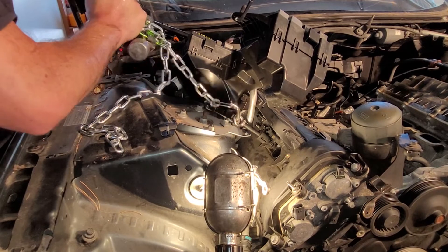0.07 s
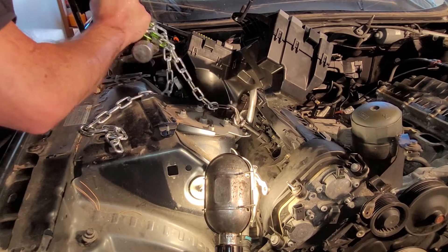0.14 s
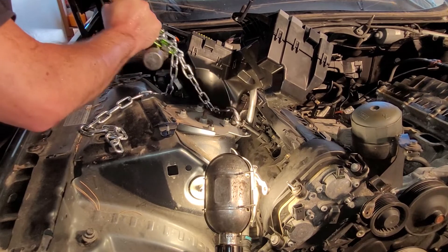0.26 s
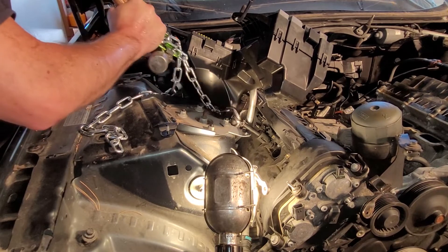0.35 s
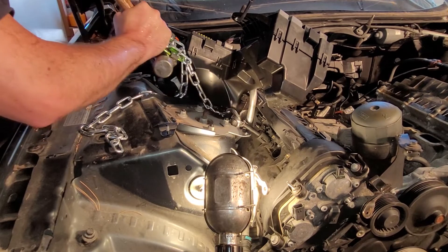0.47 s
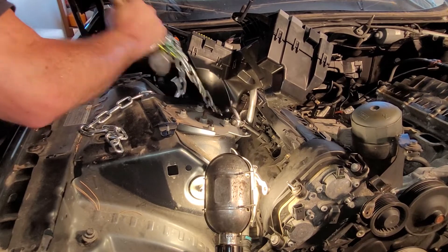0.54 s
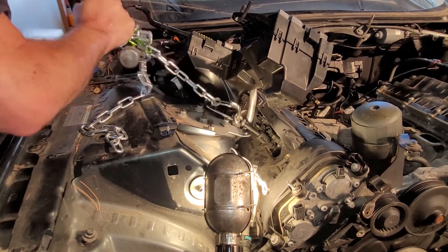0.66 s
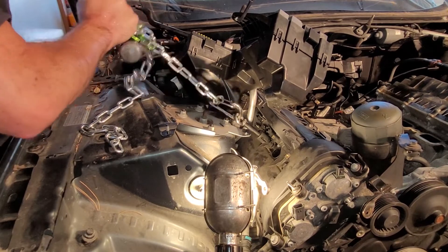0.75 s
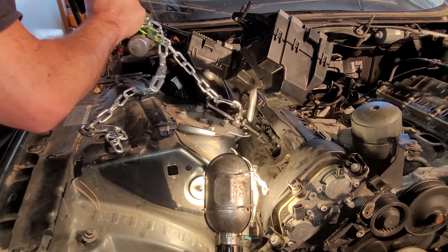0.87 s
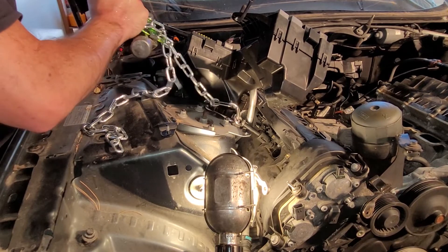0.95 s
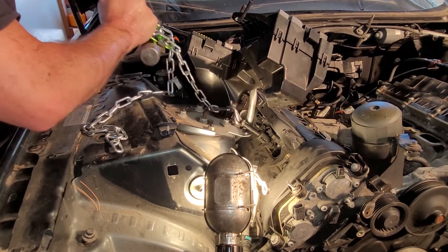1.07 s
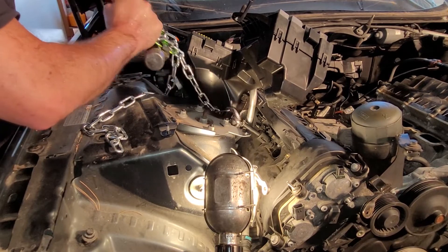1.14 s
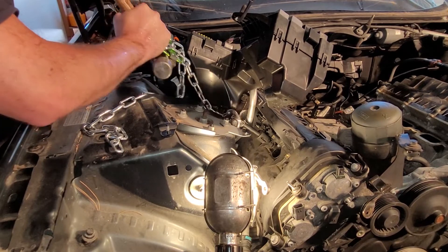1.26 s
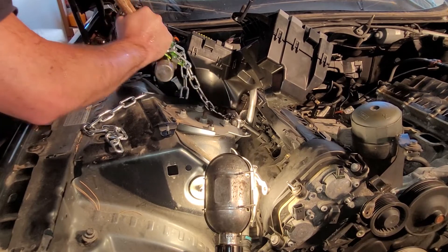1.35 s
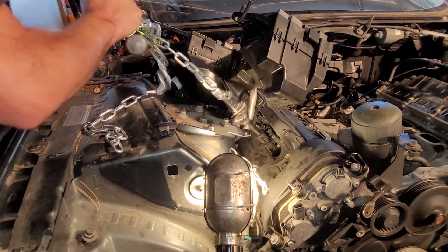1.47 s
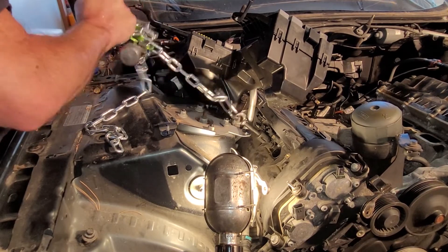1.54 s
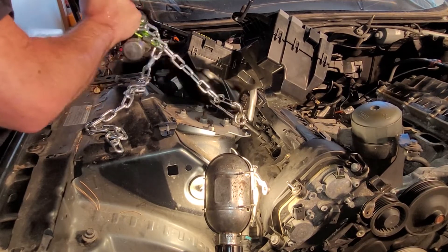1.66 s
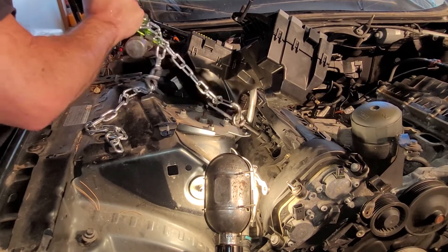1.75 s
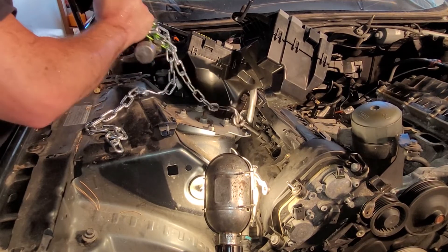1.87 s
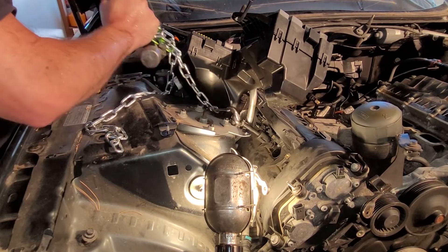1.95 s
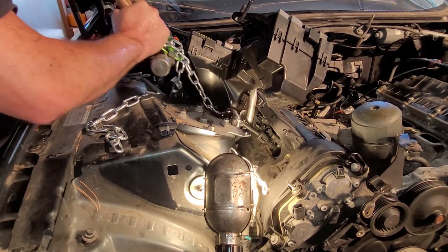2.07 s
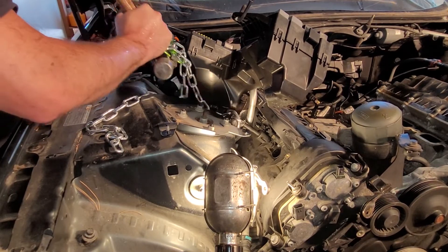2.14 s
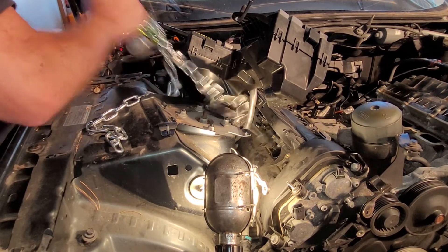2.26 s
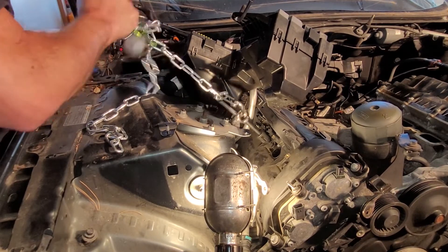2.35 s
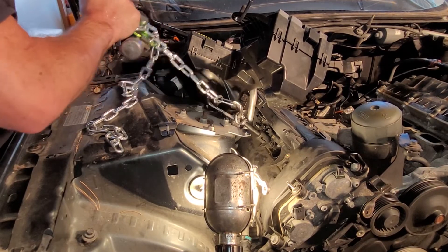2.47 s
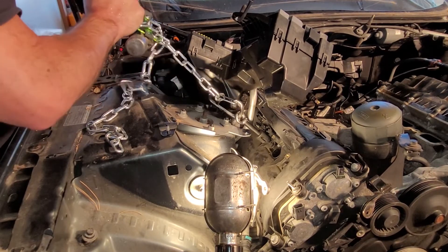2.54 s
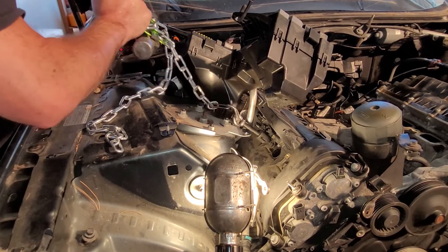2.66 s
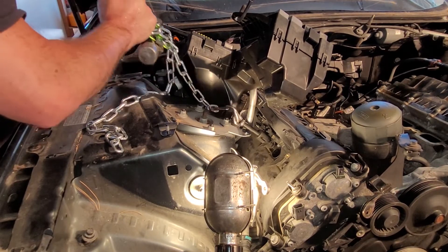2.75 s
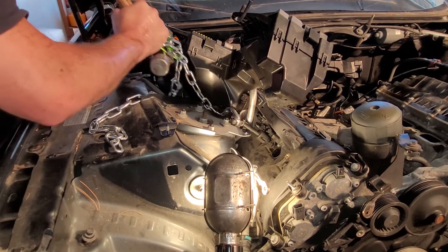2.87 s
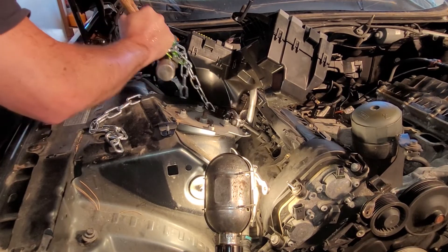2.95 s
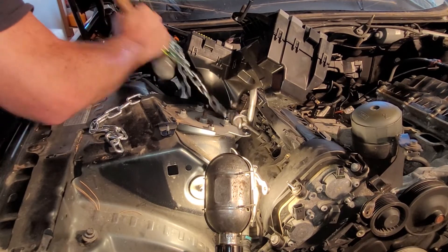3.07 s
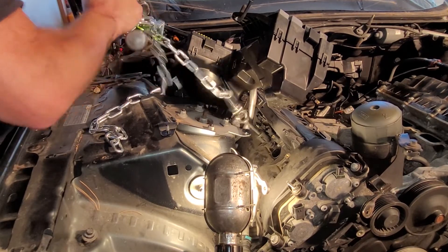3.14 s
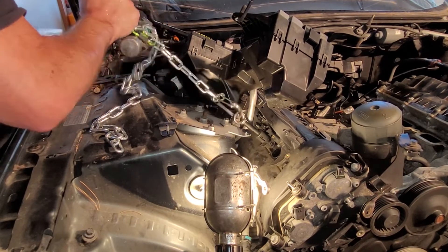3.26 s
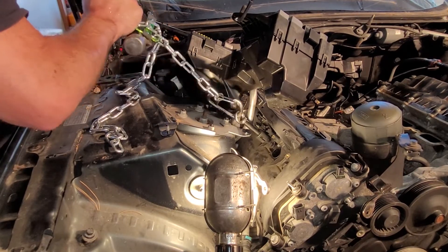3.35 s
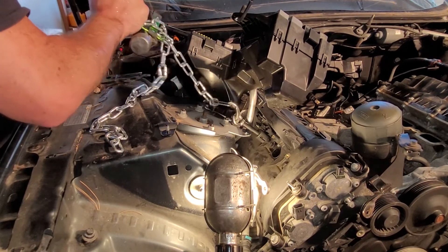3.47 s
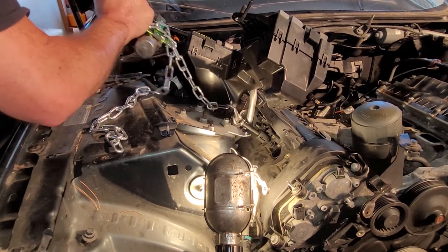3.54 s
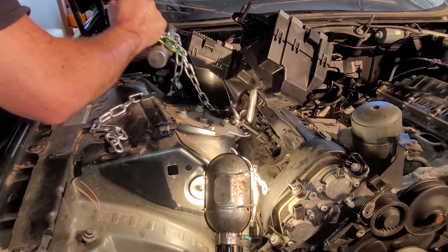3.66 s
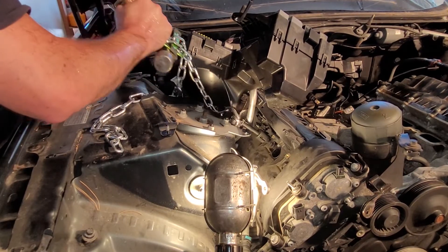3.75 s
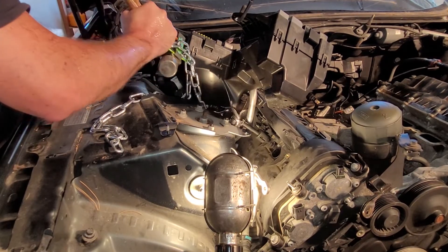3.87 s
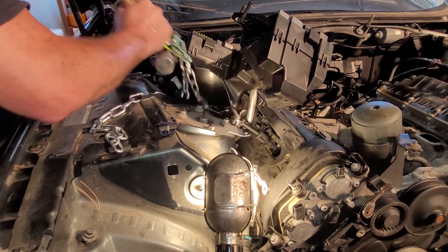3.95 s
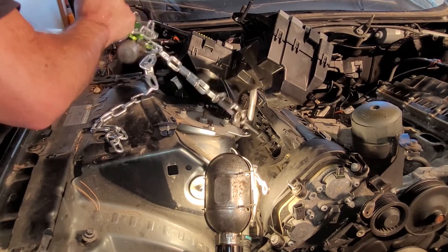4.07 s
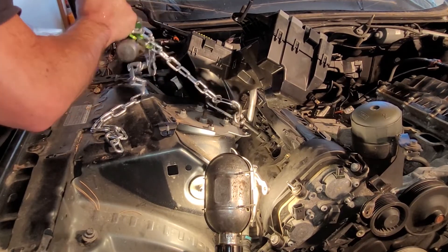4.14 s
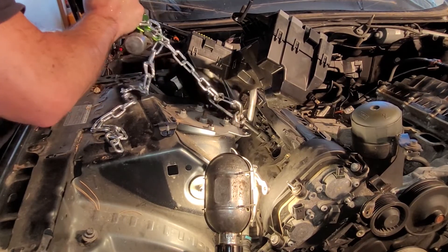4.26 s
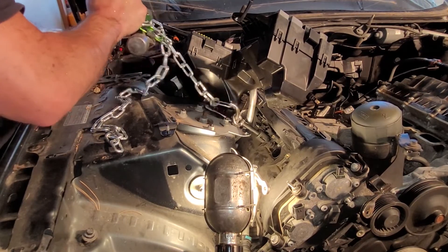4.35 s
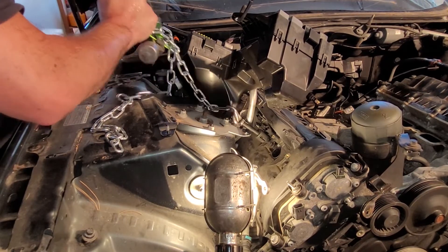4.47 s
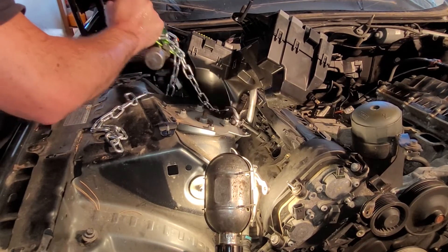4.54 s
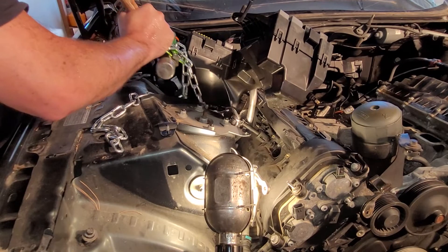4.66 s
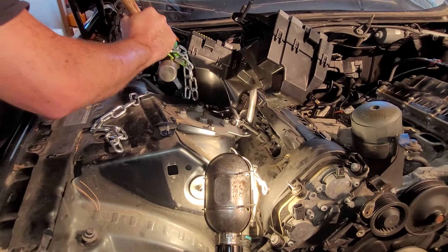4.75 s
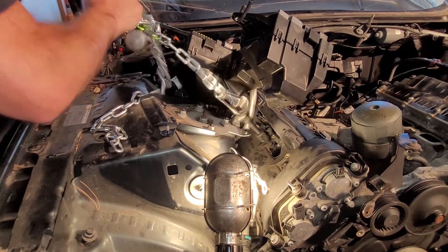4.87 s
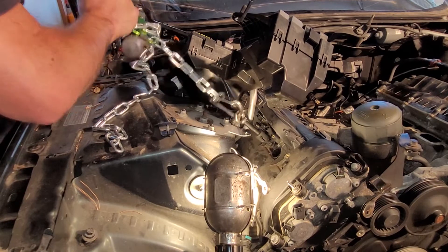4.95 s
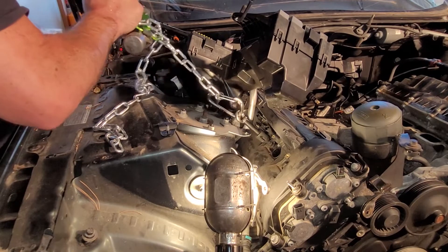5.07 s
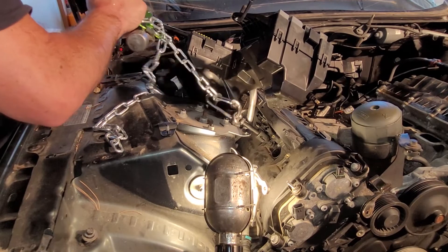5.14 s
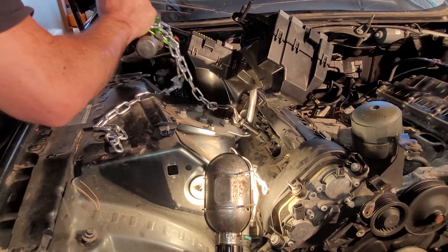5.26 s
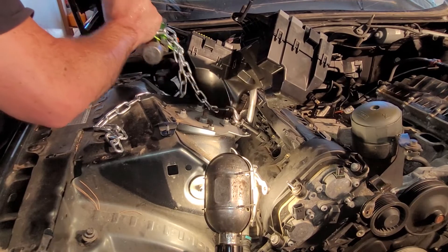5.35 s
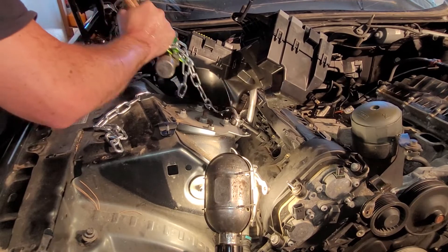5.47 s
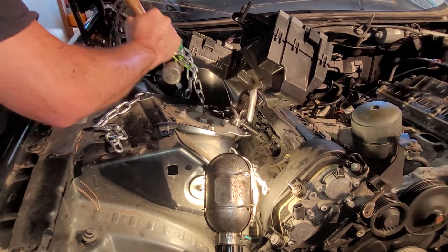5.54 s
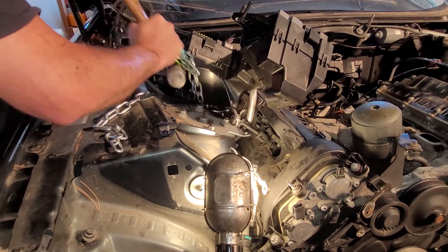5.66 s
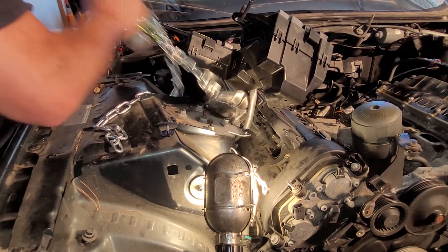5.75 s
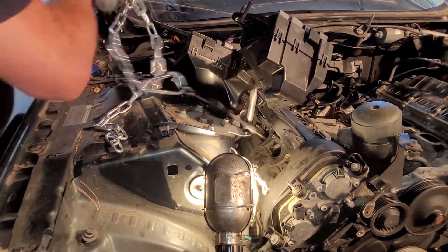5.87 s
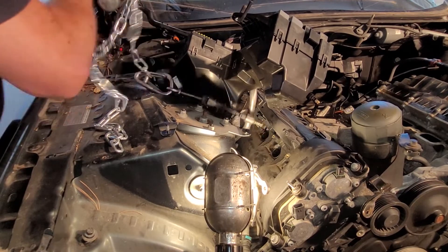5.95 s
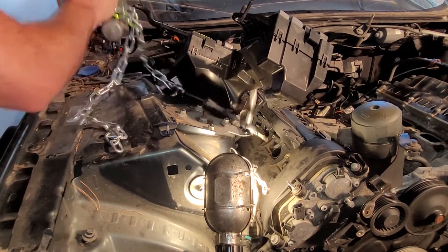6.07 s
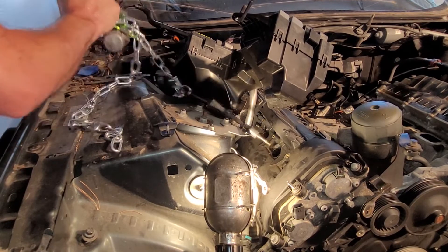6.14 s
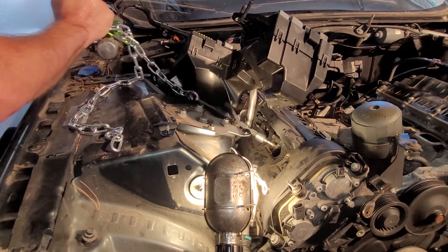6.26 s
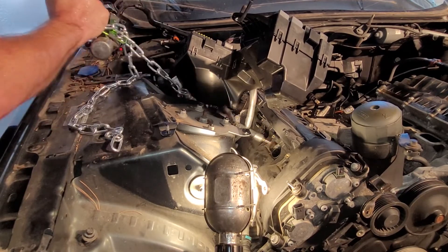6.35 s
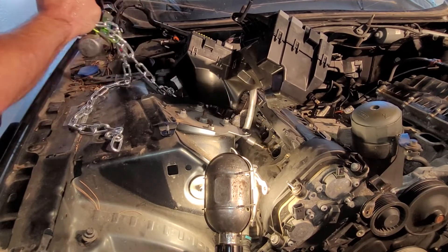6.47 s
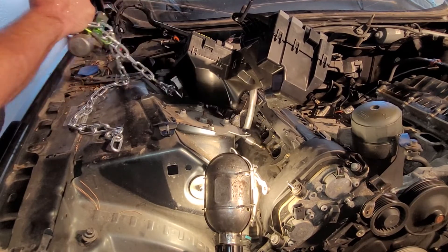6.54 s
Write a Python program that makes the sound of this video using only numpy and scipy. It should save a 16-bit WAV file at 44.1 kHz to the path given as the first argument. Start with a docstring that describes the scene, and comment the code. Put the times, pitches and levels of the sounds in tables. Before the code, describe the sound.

Loud, dry metal cracks with quick rebounds and rattling tails: a chain snapping tight, then dropping slack onto car panels. Glittering high jingles fill the gaps between jerks, quieter moments show a low hum and soft hiss. A last dense tumble adds hollow thumps and dragging links. Close stereo microphone, occasionally bumped with a low thump, in a small reverberant garage.

```python
"""In a garage, a steel chain hooked into an engine bay is yanked taut again and again with a hammer.
Blows drive noise grains through sheet-metal resonances: mid clank, bright tick, low panel thud.
Grain-driven resonators ring the links very high; short resonances clink as the slack chain drops and
drags; sets of sines knock hollowly. Decaying noise echoes answer; hum, hiss and rumble lie below,
with low swings where the microphone mount is jolted."""
import sys
import numpy as np
from scipy import signal
from scipy.fft import rfft, irfft
from scipy.io import wavfile
from scipy.ndimage import uniform_filter1d, minimum_filter1d

SR = 44100
rng = np.random.default_rng(int(sys.argv[2]) if len(sys.argv) > 2 else 0)


def log_audio(samples):
    """Write samples as a 16-bit WAV file to the path given in sys.argv[1]."""
    # one column per channel
    frames = np.atleast_2d(samples).T
    # limit to full scale, then quantise
    limited = np.clip(frames, -1, 1)
    pcm = np.round(limited * 32767).astype(np.int16)
    wavfile.write(sys.argv[1], SR, pcm)


N = 291060

# Chain and hammer striking metal.
# Each row: time in seconds, level in dB, base clatter t60 in seconds, panel thud in dB re level.
BLOWS = [(.0014,-5.5,0.15,-26),(.0887,-9.5,0.13,-30.5),(0.1251,-14.5,0.13,-19.5),(0.22,-22,0.067,-17),(.2738,-29,0.1,-17.5),(.297,-24.5,0.067,-18.5),(0.3212,-17.5,0.059,-19.5),
         (0.525,-27.5,0.062,-19.5),(.6143,-33.5,0.098,-19),(0.6496,-17,0.1,-24),(0.6688,-6,0.026,-20),(.83,-24,.07,-18),(0.8402,-11.5,0.07,-18.5),(0.8594,0,0.1,-29.5),(.872,-10,0.33,-28),
         (0.9405,-7.5,0.11,-34),(0.9936,-6,0.079,-25.5),(1.048,-15,0.28,-22),(1.155,-23,0.088,-34),(1.1745,-11.5,0.19,-26.5),(1.2283,-24.5,0.052,-8),
         (1.325,-29,0.049,-19),(1.511,-27.5,0.12,-26),(1.5331,-18.5,0.084,-20),(1.543,-15.5,0.13,-21.5),(1.708,-16,0.036,-19.5),
         (1.7249,1,0.075,-27),(1.747,-6,0.055,-27),(1.766,-9,0.052,-37),(1.8205,-16,0.064,-24),(1.855,-14.5,0.27,-29),(1.88,-11,0.044,-16.5),(1.9225,-15,0.055,-21),
         (1.9855,-24,0.1,-19),(2.0532,-12,0.034,-26.5),(2.243,-11.5,0.089,-31),(2.328,-24.5,0.095,-25),(2.3499,-21.5,0.16,-22),(2.3672,-12,0.041,-21),(2.528,-24.5,0.18,-22),(2.5517,0,0.16,-27.5),
         (2.6455,-21,.06,-29),(2.6538,-7.5,0.17,-40),(2.669,-11,0.076,-23.5),(2.7332,-12,0.11,-17),(2.781,-15.5,0.12,-24),(2.828,-15.5,0.22,-19.5),(2.934,-22,0.049,-46),
         (3.0984,-29.5,0.046,-18.5),(3.1517,-9.5,0.071,-19),(3.1995,-7.5,0.054,-17.5),(3.307,-19,0.044,-24),(3.371,-4,0.054,-36),(3.3865,0,0.093,-31.5),
         (3.5243,-21.5,0.19,-23),(3.5621,-15,0.1,-17),(3.6152,-23.5,0.24,-18),(3.677,-25.5,0.13,-26),(3.708,-15,0.1,-22.5),(3.921,-18.5,0.057,-30),
         (3.9838,-35.5,0.49,-15.5),(4.062,-20.5,0.068,-20),(4.0849,-7,0.017,-20),(4.2802,-2.5,0.13,-32),(4.376,-18.5,0.051,-20.5),
         (4.4323,-12,0.057,-18),(4.496,-15.5,0.11,-21),(4.524,-17,0.16,-39),(4.5732,-17,0.13,-22),(4.779,-13,0.094,-28),
         (4.9268,-17,0.09,-27),(4.9452,-6,0.021,-17),(5.103,-18,0.19,-21),(5.1151,-3,0.087,-26.5),(5.217,-28,0.19,-33),(5.24,-15.5,0.21,-26),
         (5.28,-13,0.065,-15.5),(5.3366,-18.5,0.1,-17.5),(5.437,-18.5,0.21,-39),(5.465,-20.5,0.24,-19),(5.6504,-20,0.067,-22),
         (5.715,-29,0.045,-15.5),(5.802,-24.5,0.1,-19.5),(5.8148,-14.5,0.17,-33),(5.8335,-10,0.094,-18.5),(5.896,-15,0.049,-19),(5.928,-15,0.04,-35),
         (5.953,-16.5,0.094,-5.5),(5.9745,-4,0.086,-10.5),(5.9876,-11.5,0.13,-21),(6.008,-19.5,0.066,-13),(6.044,-18,0.056,-6),(6.1365,-2,0.083,-24),(6.1405,1,0.036,-25),
         (6.1607,-7,0.29,-20),(6.2344,-13,0.048,-19),(6.282,-35,0.2,3.5),(6.3083,-15.5,0.093,-11.5),(6.3808,-15.5,0.062,-11),
         (6.432,-39.5,0.17,4),(6.4475,-30,0.2,-9),(6.5065,-11,0.087,-18),(6.515,-7,0.069,-21)]
SHAKE_RISE_S = 0.0091


def from_db(db):
    """Decibels to gain."""
    return 10 ** (np.asarray(db) / 20)


def rms_one(x):
    """Scale to rms 1."""
    return x / np.sqrt(np.mean(x ** 2) + 1e-20)


def butter(x, order, hz, kind="lowpass"):
    """Butterworth filter along time."""
    return signal.sosfilt(signal.butter(order, hz, kind, fs=SR, output="sos"), x)


def colour(x, spectrum, modes=(), size=4096):
    """Causal (minimum-phase) filter with this spectrum and these resonances; white noise keeps its rms."""
    hz = np.maximum(np.arange(size // 2 + 1) * SR / size, 1)
    corner_hz, corner_db = np.transpose(spectrum)
    db = np.interp(np.log(hz), np.log(corner_hz), corner_db)
    for mode_hz, width_hz, peak_db in modes:
        db = db + peak_db / (1 + (2 * (hz - mode_hz) / width_hz) ** 2)
    cepstrum = irfft(np.log(from_db(db)))
    cepstrum[1:size // 2] *= 2      # fold to minimum phase
    cepstrum[size // 2 + 1:] = 0
    pulse = irfft(np.exp(rfft(cepstrum)))
    pulse = pulse / np.sqrt(np.sum(pulse ** 2))
    return signal.oaconvolve(np.atleast_2d(x), [pulse], axes=1)[:, :N]


def grains(per_s, spread_db, apart):
    """Random clicks of uneven size and sign, each turned at random between two ports; rms 1."""
    count = int(per_s * N / SR)
    out, at = np.zeros((2, N)), rng.integers(0, N, count)
    sizes = from_db(spread_db * np.minimum(rng.exponential(1, count), 4))
    sizes = sizes * rng.choice([-1, 1], count)
    turn = np.pi / 4 + apart * rng.standard_normal(count)
    out[:, at] = sizes * np.array([np.cos(turn), np.sin(turn)])
    return rms_one(out)


def ring(clicks, hz, t60):
    """Two-pole resonator: a unit click sets a decaying sine of starting height 1 ringing."""
    r, w = from_db(-60 / (t60 * SR)), 2 * np.pi * hz / SR
    return signal.lfilter([0, np.sin(w)], [1, -2 * r * np.cos(w), r * r], clicks + 1e-18)


def struck(db, t60, crack_db, rattle, skips=np.zeros((len(BLOWS), 1))):
    """Per blow a crack and its rebounds, then links tumbling as grains that swell briefly and die."""
    crack_growth = 0.11             # dB per dB: hard blows crack more sharply
    rebound_loss_db = 12.5          # per skip
    burst, burst_s = 0.51, 0.0056   # extra power early in a blow
    swell_s = .0006
    cracks, power, t = np.zeros(N), np.zeros(N), np.arange(SR // 2) / SR
    onset = (1 - np.exp(-t / swell_s)) * (1 + burst * np.exp(-t / burst_s))
    for (s, *_), level_db, die, skip in zip(BLOWS, db, t60, skips):
        i = round(s * SR)
        touches = np.minimum(i + (skip * SR).astype(int), N - 1)
        first_db = level_db + crack_db + crack_growth * (level_db - np.median(db))
        cracks[touches] += from_db(first_db - rebound_loss_db * np.arange(len(skip)))
        decay = from_db(2 * (level_db - 60 * t / np.clip(die, .02, 1)))
        power[i:i + len(t)] += (decay * onset)[:N - i]
    return cracks + np.sqrt(power) * rattle


def bodywork(jingle, scrape):
    """Blows and dragging excite the sheet metal: mid clank, bright tick, low panel thud."""
    # Sheet-metal resonances. Each row: nominal pitch in Hz, width in Hz, peak in dB.
    panel_modes = [(441, 90, 3), (834, 120, 1.5), (1230, 90, 1.5), (1860, 120, 1.5), (2380, 100, 1.5),
                   (3000, 120, 2), (4230, 120, 2.5), (4560, 300, 4.5), (4800, 150, 2.5), (6600, 200, 2),
                   (7640, 250, 2)]
    # Excitation spectra. Each row: frequency in Hz, relative density in dB per Hz.
    clank_spectrum = [(500, -30.5), (1000, -7), (1800, -5), (3000, -5), (4600, 9.5), (5400, 5.5), (7000, 0),
                      (12000, -17.5)]
    treble_spectrum = [(3000, -35.5), (5500, 11.5), (7500, 9.5), (10000, 7.5), (13000, 1), (15700, 2.5)]
    thud_spectrum = [(120, -17.5), (250, -7), (500, -5), (850, 2.5), (1300, 1.5), (1900, 4.5), (2600, 1),
                     (4000, -51)]
    # Resonance shift per spot of metal, clank only. One column: pitch ratio.
    spot_tuning = [.93, 1.0, 1.05]
    tick_base_db, tick_squash, tick_with_jingle = -14.5, 0.19, 0.3   # last two in dB per dB
    jingle_tick_db = -33   # links knocking each other, re their ring
    rebounds, mean_gap_s = 4, 0.0048
    clump_db, clump_cutoff_hz = 1.5, 86

    s, peak_db, t60, thud_db = np.transpose(BLOWS)
    shaken_db = np.clip(jingle[((s + SHAKE_RISE_S) * SR).astype(int)] + 30, -20, 20)
    tick_db = tick_base_db - tick_squash * (peak_db + 3.5) + tick_with_jingle * shaken_db

    rattle = grains(3500, spread_db=3.0, apart=0.9)      # the same contacts drive all bands
    clumps = butter(rng.standard_normal(N), 2, clump_cutoff_hz)
    rattle = rms_one(rattle * from_db(clump_db * rms_one(clumps)))
    gaps = mean_gap_s * (.5 + rng.random((len(BLOWS), rebounds)))
    skips = np.cumsum(gaps, axis=1) - gaps[:, :1]        # first touch at the blow itself

    clank = struck(peak_db - 8.5, t60, 18.2, rattle, skips)
    clank = clank + from_db(-4) * scrape * rattle
    tick = struck(peak_db + tick_db, 1.34 * t60, 6.6, rattle, skips)
    tick = tick + (from_db(-23.0) * scrape + from_db(jingle + jingle_tick_db)) * rattle
    thud = struck(peak_db + thud_db + 3.5, 1.815 * t60, 17.3, rattle)
    thud = thud + from_db(-8.5) * scrape * rattle

    # each blow picks a spot, held until the next
    latest_blow = np.maximum(np.searchsorted(s, np.arange(N) / SR, "right") - 1, 0)
    spot = rng.integers(0, len(spot_tuning), len(BLOWS))[latest_blow]
    clank = sum(colour(clank * (spot == k), clank_spectrum, np.array(panel_modes) * [ratio, 1, 1])
                for k, ratio in enumerate(spot_tuning))
    tick = colour(tick, treble_spectrum, panel_modes)
    return clank + tick + colour(thud, thud_spectrum, panel_modes)


def jingle_db():
    """Link ring level: each shake swells, sags while it lasts, then rings out; blows add short rings."""
    # Chain shaken, links knocking each other. Each row: start in seconds, level in dB, length in seconds.
    shakes = [(0.0,-20,0.18),(0.211,-21.5,0.059),(0.335,-37,0.048),(0.416,-41,0.0045),(0.649,-10,0.039),(0.704,-8,0.11),(0.912,-15.5,0.24),(1.193,-24,0.055),(1.31,-29,.01),(1.344,-22,0.0031),
              (1.507,-22,0.014),(1.53,-5.5,0.22),(1.79,-24.5,0.087),(1.84,-19.5,0.2),(2.187,-37.5,0.071),(2.275,-20,0.0081),(2.346,-10,0.11),(2.381,-6,0.39),(2.746,-30,0.15),(2.954,-33,0.14),(3.191,-5,0.26),
              (3.516,-22.5,0.23),(3.784,-35.5,0.092),(3.978,-39,0.041),(4.067,-10,0.076),(4.084,-8.5,0.24),(4.323,-24,0.17),(4.477,-24.5,0.15),(4.687,-31,0.027),(4.771,-31,.015),
              (4.907,-31,.01),(4.931,-14,0.038),(4.937,-5,0.45),(5.459,-24,0.03),(5.461,-25,0.11),(5.59,-33,0.11),(5.707,-26.5,0.016),(5.77,-31,0.033),(5.794,-29,0.026),(5.808,-13.5,0.074),(5.87,-13,0.013),(5.905,-20,0.07),(5.985,-19,0.027),(6.083,-22.5,0.053),
              (6.143,-13,0.11)]
    sag_db_per_s, stop_db_per_s = 61, 376   # stop adds to sag
    rise_share = 0.092                      # of the length: long shakes swell more slowly
    blow_ring_db, blow_ring_t60_s = -19.5, 0.14
    s, level_db, length = np.transpose(shakes)[:, :, None]
    grid_s = np.arange(0, N / SR, .001)
    t = np.clip(grid_s - s, 0, None)
    db = level_db - sag_db_per_s * t - stop_db_per_s * np.clip(t - length, 0, None)
    swell = 1 - np.exp(-t / (SHAKE_RISE_S + rise_share * length))
    shaken = np.sum(from_db(2 * db) * swell ** 2, axis=0)
    peak_db = np.transpose(BLOWS)[1]
    hit = struck(peak_db + blow_ring_db, np.full(len(BLOWS), blow_ring_t60_s), -np.inf, 1.0)   # no cracks
    return 10 * np.log10(np.interp(np.arange(N) / SR, grid_s, shaken) + hit ** 2 + 1e-12)


def links(jingle):
    """Every link is knocked at its own random moments and rings on its bending mode."""
    # Bending mode of each link. Each row: relative level in dB, t60 in seconds.
    link_modes = [(-3.5, 0.06), (10.5, 0.045), (6, 0.064), (-3, 0.074), (-3, 0.031), (13.5, 0.041),
                  (-9, 0.025), (16.5, 0.14), (2.5, 0.32), (-8, 0.2), (9, 0.064), (-4, 0.075)]
    # Mode pitch of each link, tuned a little apart. One column: pitch in Hz.
    link_hz = [14083, 14225, 14300, 14395, 14700, 14766, 14950, 15030, 15063, 15100, 15183, 15230]
    out = np.zeros((2, N))
    for hz, (level_db, t60) in zip(link_hz, link_modes):
        knocked = grains(300, spread_db=3.0, apart=0.38)
        out += from_db(level_db) * rms_one(ring(knocked, hz, t60))
    return from_db(jingle) * rms_one(out)


def drag():
    """Scrape envelope: after each landing the slack chain drags on, swelling and fading."""
    # Slack chain landing on the bodywork. Each row: start in seconds, scrape level before fading in dB.
    landings = [(.86,-19),(1.726,-20.5),(2.24,-36.5),(2.552,-42),(3.2,-27.5),(3.53,-33.5),(4.07,-31.5),(4.281,-23.5),(5.116,-26.5),(5.45,-29.5),(5.9,-23.5),(6.28,-33)]
    rise_s, fade_db_per_s = 0.23, 60.5
    s, level_db = np.transpose(landings)[:, :, None]
    grid_s = np.arange(0, N / SR, .001)
    t = np.clip(grid_s - s, 0, None)
    each = from_db(level_db - fade_db_per_s * t) * np.minimum(t / rise_s, 1)
    return np.interp(np.arange(N) / SR, grid_s, np.sqrt(np.sum(each ** 2, axis=0)))


def clinks(scrape, count=56):
    """Single links landing: each finds one short metallic resonance of the spot it hits."""
    # Overall clink colour. Each row: frequency in Hz, relative density in dB per Hz.
    clink_spectrum = [(1000, -21.5), (2500, -3), (4600, 5), (5600, -4), (9000, -2.5)]
    _, peak_db, t60, *_ = np.transpose(BLOWS)
    tumbling = struck(peak_db - 43, t60, -47, np.ones(N)) + from_db(-35.0) * scrape
    out = sum(ring(tumbling * grains(24, spread_db=2.5, apart=0.68), hz, t60=.022)
              for hz in np.geomspace(1300, 9000, count))
    return colour(out, clink_spectrum)


def knocks():
    """Chain snapping taut or landing: soft contacts whose cavity modes swell over a few cycles."""
    # Hollow knocks of the car body. Each row: time in seconds, level in dB, main cavity pitch in Hz.
    knock_events = [(0.67, -14, 470), (3.199, -29, 452), (3.205, -16.5, 458), (3.216, -20, 390),
                    (4.083, -22, 477), (4.95, -26, 506), (5.826, -28, 540), (5.836, -19.5, 488),
                    (5.867, -20, 566), (5.876, -19, 470), (5.889, -23, 580), (5.902, -28, 710),
                    (5.921, -25, 422), (5.936, -26, 350), (5.956, -9.5, 463), (5.985, -26, 413),
                    (6.009, -31, 440), (6.069, -23, 432), (6.145, -32, 813), (6.165, -25.5, 836),
                    (6.205, -25, 854), (6.281, -21.5, 633), (6.297, -26, 760), (6.383, -29.5, 468)]
    # Cavity modes. Each row: pitch ratio, mean level in dB re knock, t60 in seconds.
    cavity_modes = [(.66, -9, 0.067), (0.851, -5.5, 0.072), (0.999, 1, 0.06), (1.25, 1, 0.024),
                    (1.6, 4, 0.01), (1.8, -18, 0.065), (2.4, -7, 0.046)]
    swell_s = 0.0031
    out, t = np.zeros(N), np.arange(SR // 5) / SR
    ratio, level_db, t60 = np.transpose(cavity_modes)[:, :, None]
    uneven_db = 2.0 * rng.standard_normal((len(knock_events), len(cavity_modes), 1))
    for (s, peak_db, hz), uneven in zip(knock_events, uneven_db):
        gain = from_db(peak_db + level_db + uneven - 60 * t / t60)
        modes = gain * np.sin(2 * np.pi * hz * ratio * t)
        modes[1::2] *= -1      # neighbouring modes start opposed, so the knock blooms late
        i = round(s * SR)
        out[i:i + len(t)] += (modes.sum(axis=0) * (1 - np.exp(-t / swell_s)))[:N - i]
    return out


def garage(x):
    """Diffuse echoes, dying exponentially; they differ at each port above the lows."""
    t60_s, alike_below_hz = 0.28, 540   # long waves reach both ports alike
    t = np.arange(SR // 2) / SR
    own = rng.standard_normal((2, len(t)))
    apart = butter(own[1] - own[0], 2, alike_below_hz, "highpass")
    echoes = np.array([own[0], own[0] + apart]) * from_db(-60 * t / t60_s) * (t > .003)
    echoes /= np.sqrt(np.sum(echoes ** 2, axis=1, keepdims=True))
    return np.array([signal.fftconvolve(x, e)[:N] for e in echoes])


def jolts():
    """Each jolt is one slow, damped swing of the microphone mount; the right port feels it unevenly."""
    # Jolts through the mount. Each row: time in seconds, level before port gain in dB.
    jolt_events = [(0.669, -39), (0.86, -43), (0.891, -48), (1.535, -41.5), (1.59, -36), (1.617, -40.5),
                   (2.366, -50), (3.201, -38), (3.219, -44), (3.267, -42), (4.299, -49), (4.959, -40),
                   (4.99, -41), (5.965, -45)]
    # Port gain, left then right. One column: gain in dB.
    port_gain_db = [
        [15.5],
        [12],
    ]
    right_lag_s = 0.00037
    swing = butter(signal.unit_impulse(SR // 4), 1, [35, 90], "band")
    swing = butter(swing, 2, 350)
    clicks = np.zeros((2, N + SR))
    for s, level_db in jolt_events:
        at = [round(s * SR), round((s + right_lag_s) * SR)]
        clicks[[0, 1], at] = -from_db(level_db) * np.array([1, rng.uniform(-0.59, 1)])
    return signal.oaconvolve(clicks, [swing / swing.max()], axes=1)[:, :N] * from_db(port_gain_db)


def background():
    """A wavering hum over a soft hiss, and a low rumble of its own at each port."""
    # Hiss colour. Each row: frequency in Hz, relative density in dB per Hz.
    hiss_spectrum = [(18, -55), (30, -3), (237, 23), (1440, 10), (3230, 10), (4540, 13), (6210, -4),
                     (12900, -59), (14000, -13), (15500, 12.5)]
    # The hum swells and sinks. Each row: time in seconds, steady sine's level in dB.
    hum_level = [(0, -58), (1.2, -54.5), (1.9, -57), (2.6, -72), (3.2, -56), (3.7, -63.5), (4.4, -62),
                 (4.9, -54.5), (5.7, -54.5), (6.05, -45.5), (6.3, -64), (6.6, -65)]
    hum_hz, hiss_db, rumble_db = 110, -54, -66.5   # hiss and rumble before mix and port gains
    t = np.arange(N) / SR
    waver = butter(rng.standard_normal(N), 2, [hum_hz - 8, hum_hz + 8], "band")
    tone = np.sin(2 * np.pi * hum_hz * t) + .3 * rms_one(waver)
    hum = from_db(np.interp(t, *np.transpose(hum_level))) * tone
    shared, left, right = colour(rng.standard_normal((3, N)), hiss_spectrum)
    own = butter([left, right], 2, 250, "highpass")
    hiss = from_db(hiss_db) * (1.39 * shared + 1.45 * own)
    rumble = butter(rng.standard_normal((2, N)), 2, [40, 170], "band")
    return hum + hiss + from_db(rumble_db) * rms_one(rumble) * from_db([[3], [-3]])


def scene():
    """Direct sound reaches the left port first; each port favours some frequencies."""
    # Microphone port balance. Each row: frequency in Hz, left over right in dB.
    port_balance = [(60, 35), (120, -10.5), (240, 1.5), (480, 2.5), (950, -1), (1890, 2.5), (3770, -1.5),
                    (7520, -0.5), (15000, 6)]
    right_lag_s, garage_db = .00027, -3
    jingle, scrape = jingle_db(), drag()
    hollow = knocks()
    body = bodywork(jingle, scrape) + clinks(scrape) + hollow
    body = butter(body, 2, 110, "highpass")   # small parts radiate no bass
    air = body + links(jingle)
    lag = round(right_lag_s * SR)
    air[1] = np.r_[np.zeros(lag), air[1, :N - lag]]
    to_garage = body.mean(axis=0) - 0.61 * hollow   # hollow knocks are sent more weakly to the echoes
    air = air + from_db(garage_db) * garage(to_garage)
    ports = [[(hz, side * db / 2) for hz, db in port_balance] for side in (1, -1)]
    air = np.vstack([colour(x, port) for x, port in zip(air, ports)]) * from_db([[1.2], [-1.2]])
    return air + jolts() + background()


def record(dry):
    """A look-ahead limiter eases the loudest peaks under a ceiling; a steep low-pass cuts the top."""
    ceiling, cutoff_hz = .97, 15740
    steep = signal.ellip(12, .3, 70, cutoff_hz, fs=SR, output="sos")
    room_left = ceiling / np.maximum(np.abs(dry).max(axis=0), ceiling)
    gain = uniform_filter1d(minimum_filter1d(room_left, size=257), size=129)
    return signal.sosfilt(steep, dry * gain)


dry = scene()
out = record(dry)
log_audio(out)
```